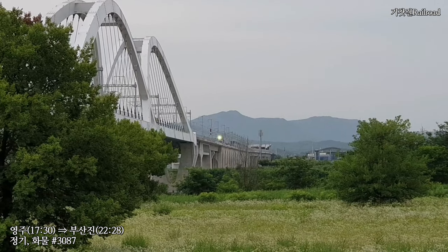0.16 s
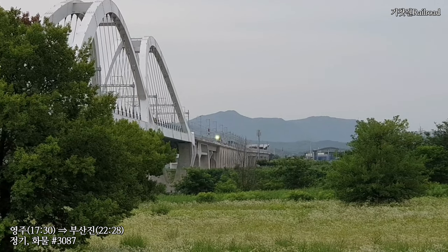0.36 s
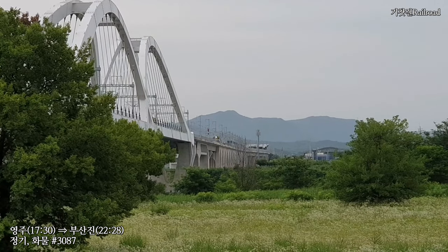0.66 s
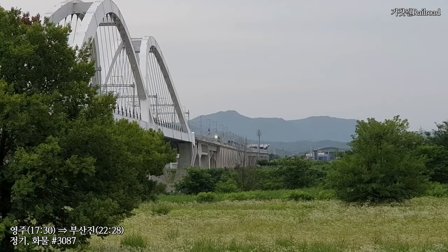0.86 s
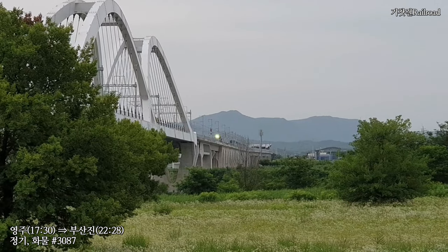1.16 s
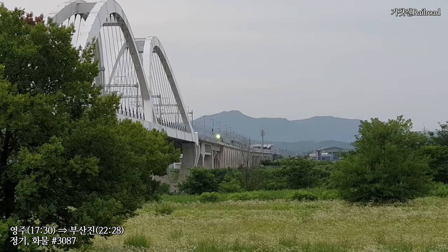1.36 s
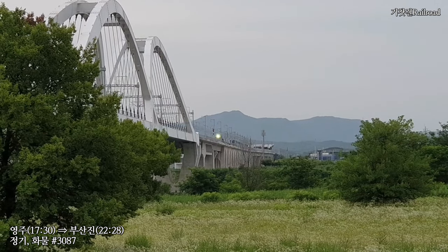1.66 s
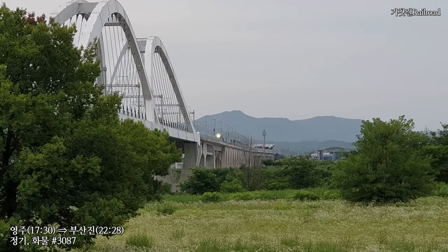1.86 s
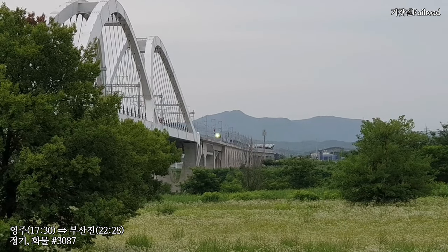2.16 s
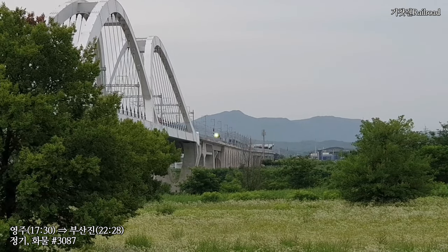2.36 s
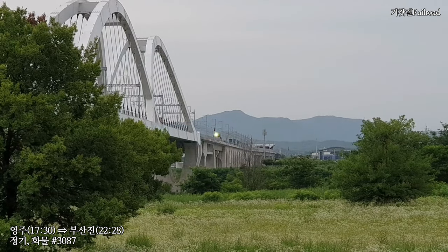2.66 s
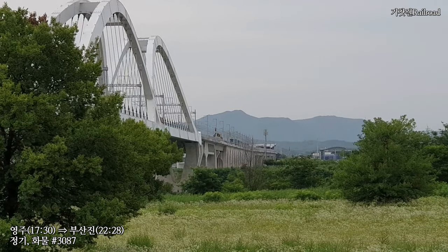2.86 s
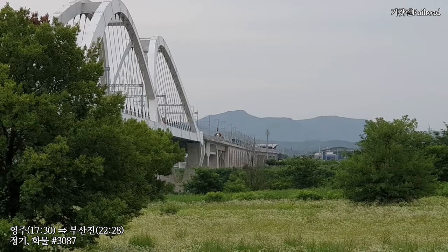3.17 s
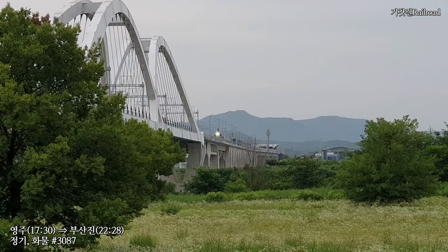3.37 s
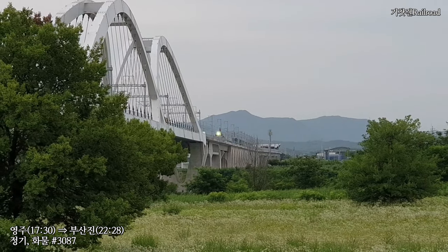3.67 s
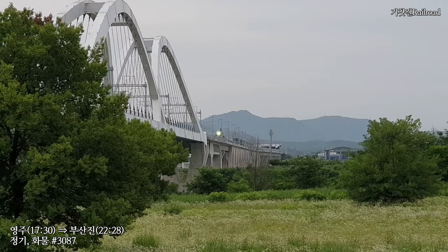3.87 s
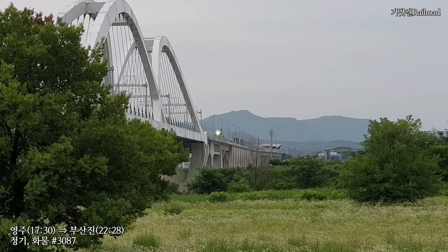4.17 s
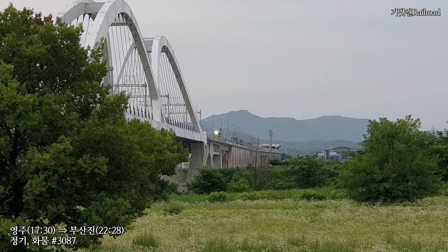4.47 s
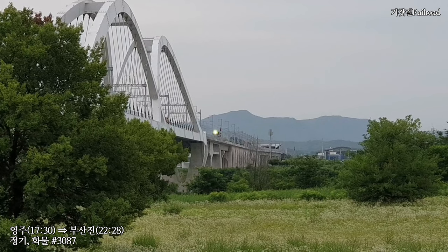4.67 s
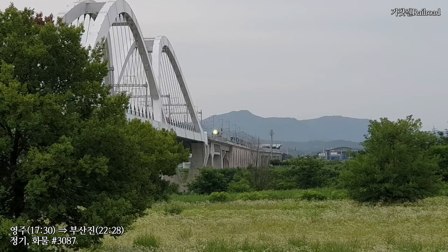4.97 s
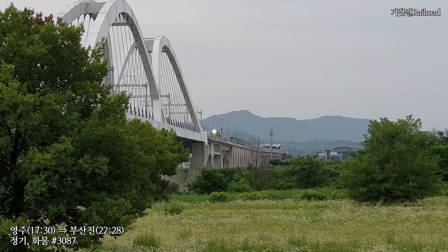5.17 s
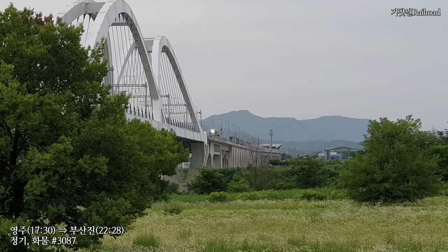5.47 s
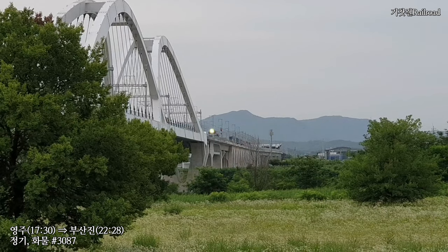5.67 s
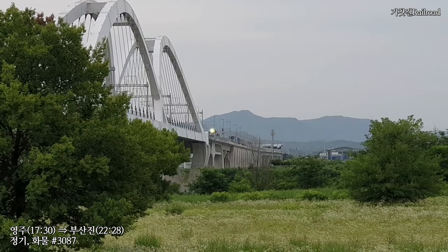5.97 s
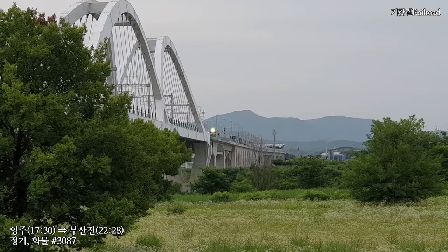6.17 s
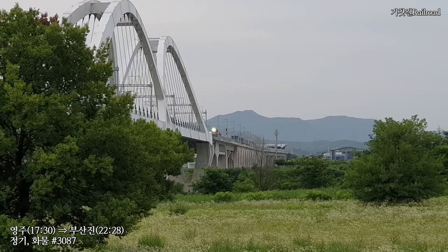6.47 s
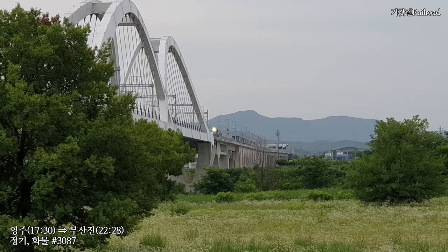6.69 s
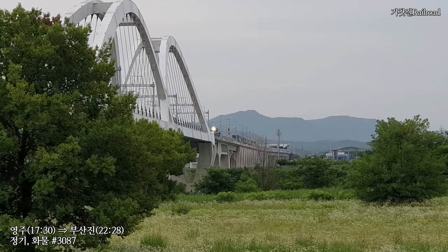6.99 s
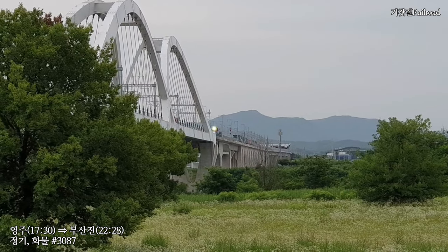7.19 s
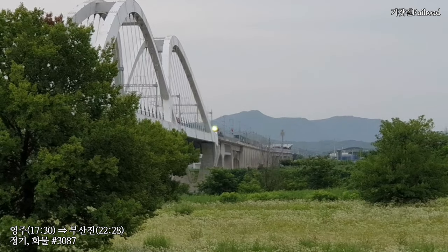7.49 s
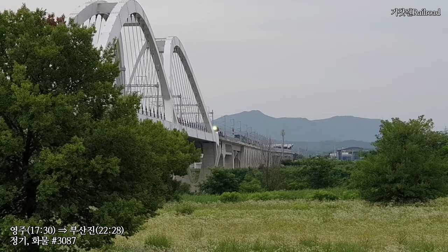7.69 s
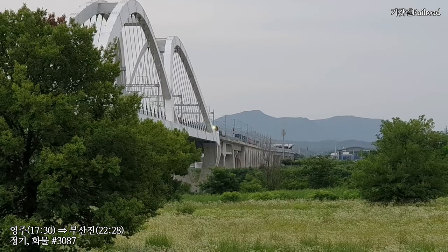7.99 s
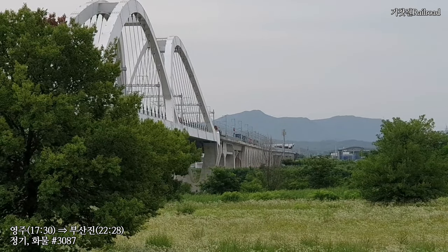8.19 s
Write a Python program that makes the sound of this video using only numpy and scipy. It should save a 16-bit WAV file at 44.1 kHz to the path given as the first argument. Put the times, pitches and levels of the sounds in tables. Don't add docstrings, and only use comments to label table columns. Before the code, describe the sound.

A wide, distant stereo pickup in open grass: a low diesel drone with a gentle throb, soft bridge rumble and river wash under a bright insect chorus. Fast dry cricket scraping opens the scene and comes back later for over a second. Between and after, brief husky sparrow chirps come from bushes on the right. Near the end the engine drone swells, changes tone and eases.

```python
import sys
import numpy as np
from scipy import signal
from scipy.fft import rfft, irfft, next_fast_len
from scipy.io import wavfile
from scipy.ndimage import uniform_filter1d

SR = 44100
rng = np.random.default_rng(int(sys.argv[2]) if len(sys.argv) > 2 else 0)


def invert_db(level):
    return 10 ** (np.asarray(level, dtype=float) / 20)


def materialize(psi):
    bounded = np.clip(np.atleast_2d(psi).T, -1, 1)
    quanta = np.round(bounded * 32767).astype(np.int16)
    wavfile.write(sys.argv[1], SR, quanta)


N = 367794
TIME = np.arange(N) / SR
SIZE = next_fast_len(N)
FREQ = np.maximum(np.arange(SIZE // 2 + 1) * SR / SIZE, 1)


def curve(table):
    s, value = np.transpose(table)
    return np.interp(TIME, s, value)


def over_hz(table, hz):
    f, v = np.transpose(table)
    return np.interp(np.log(hz), np.log(f), v)


def level(x, db):
    return x * invert_db(db) / np.sqrt(np.mean(x ** 2))


def walk(rate_hz):
    knots = rng.standard_normal(int(N / SR * 2 * rate_hz) + 3)
    knots = uniform_filter1d(knots, size=2) * 1.6
    return np.interp(TIME * 2 * rate_hz, np.arange(len(knots)), knots)


def bands(spectrum, low_hz, high_hz, octaves):
    centres = low_hz * 2 ** np.arange(0, np.log2(high_hz / low_hz) + octaves, octaves)
    place = np.clip(np.log2(FREQ / low_hz) / octaves, 0, len(centres) - 1)
    for k, hz in enumerate(centres):
        weight = np.cos(np.pi / 2 * np.clip(place - k, -1, 1)) ** 2
        yield hz, irfft(spectrum * weight, SIZE)[..., :N]


def noise(colour, channels):
    return rfft(rng.standard_normal((channels, SIZE))) * invert_db(over_hz(colour, FREQ))


def scatter(x, t60_s, gap_s):
    t = np.arange(int(SR * .6)) / SR
    envelope = invert_db(-60 * t / t60_s) * (1 - np.exp(-t / gap_s))
    tail = rng.standard_normal((2, len(t))) * envelope
    tail = tail / np.sqrt(np.sum(tail ** 2, axis=1, keepdims=True))
    both = np.atleast_2d(x) * np.ones((2, 1))
    return signal.fftconvolve(both, tail, axes=1)[:, :N]


def pan(x, db):
    return x * invert_db(np.array([[db / 2], [-db / 2]]))


# time in seconds, level in dB.
DRONE = [(0, -38), (.8, -37), (1.5, -38.5), (2.4, -37.5), (3.3, -36), (4.15, -35), (4.55, -37), (4.9, -38),
         (5.4, -38.5), (6.5, -37), (6.9, -33), (7.2, -32.5), (7.5, -34.5), (7.8, -35), (8.1, -37.5),
         (8.33, -42)]
# shaft order, level in dB, change in dB once behind the arch.
SIDE_ORDERS = [
    (7, -46.5, 0),
    (9, -47, -12),
    (11, -55, 11),
]
# order, level in dB.
WEAK_ORDERS = [(4, -62.5), (5, -55), (6, -57), (10, -63.5), (12, -58.5), (13, -66.5), (14, -78.5),
               (15, -63), (16, -62), (17, -67), (18, -73), (19, -81.5), (23, -70.5), (24, -69)]
SHAFT_HZ, SLOWING_HZ_PER_S, START_RAD = 10.1866, .0012, -.12
ARCH_S, ARCH_RISE_S = 7.63, .25


def engine():
    turn = 2 * np.pi * (SHAFT_HZ * TIME - SLOWING_HZ_PER_S * TIME ** 2 / 2) + START_RAD
    arch = 1 / (1 + np.exp((ARCH_S - TIME) / ARCH_RISE_S))
    orders = [(8, curve(DRONE))]
    for order, db, change_db in SIDE_ORDERS:
        orders.append((order, db + change_db * arch + 2 * walk(2)))
    for order, db in WEAK_ORDERS:
        orders.append((order, db + .51 * (TIME - 4) + 3 * walk(1.2)))
    out = np.zeros(N)
    for order, db in orders:
        away = abs(order - 8)
        gust_db = (.8 if away == 0 else 1.4) * walk(7)
        lag_rad = away ** 1.45 + (away > 3) * rng.uniform(0, 2 * np.pi)
        out += invert_db(db + gust_db) * np.cos(order * turn + lag_rad)
    return pan(np.sqrt(2) * out, -3.5)


# time in seconds, nearness in dB.
RUMBLE_NEAR = [(0, -0.5), (1.5, -0.5), (2.8, 0), (3.6, -2), (5, -1), (6.3, 0.5), (7.2, 1.5), (8.34, 2)]
# frequency in Hz, density in dB per Hz.
RUMBLE_COLOUR = [(22, -7), (38, 5.5), (55, 14), (100, 0.5), (200, 1), (350, -4.5), (500, 1.5), (750, -5),
                 (1000, -13.5), (1500, -22.5), (2200, -35.5), (2800, -35.5), (3500, -41), (16000, -39.5)]
# frequency in Hz, left-right likeness 0-1.
RUMBLE_ALIKE = [(60, 1), (130, 0.5), (290, 0.79), (640, 0.31), (1400, 0.12)]
# frequency in Hz, left minus right in dB.
RUMBLE_PAN = [(100, -1.5), (700, -3), (1300, -6.5), (2400, -8.5), (5000, -4)]
BRIGHT_PER_DB, AIR_HZ = .8, 2700


def rumble():
    near_db = curve(RUMBLE_NEAR)
    mid, side = noise(RUMBLE_COLOUR, channels=2)
    alike = np.clip(over_hz(RUMBLE_ALIKE, FREQ), 0, 1)
    sign = np.array([[1], [-1]])
    pair = np.sqrt(1 + alike) * mid + sign * np.sqrt(1 - alike) * side
    pair = pair * invert_db(sign * over_hz(RUMBLE_PAN, FREQ) / 2)
    out = 0
    for hz, x in bands(pair, 40.8, 4000, .527):
        bright = 1 + BRIGHT_PER_DB * np.clip(np.log2(hz / 600), 0, 1)
        out = out + x * invert_db((hz < AIR_HZ) * bright * near_db + 1.12 * walk(5))
    return level(out, -49)


# time in seconds, peak in dB.
KNOCKS = [(.5, -82), (1.421, -65), (1.761, -71.5), (1.908, -69), (2.01, -86), (2.244, -61.5), (2.65, -78),
          (2.8, -63), (3.269, -72), (5.27, -72), (6.95, -76), (7.03, -70)]
# frequency in Hz, level in dB, t60 in seconds.
GIRDER = [(1000, 0, .05), (1250, -4, .04), (1700, -9, .05), (2120, -11, .03), (2850, -10, .03)]


def knocks():
    blows = np.zeros(N)
    for s, db in KNOCKS:
        blows += invert_db(db - 370 * np.abs(TIME - s))
    blows *= rng.standard_normal(N)
    t = np.arange(int(SR * .4)) / SR
    ring = sum(invert_db(db - 60 * t / t60_s) * np.sin(2 * np.pi * hz * t) for hz, db, t60_s in GIRDER)
    direct = signal.fftconvolve(blows, ring)[:N] * invert_db(-21.5)
    return pan(direct + scatter(direct, .29, .0062), -15)


# first stroke in seconds, end in seconds, stroke period in seconds,
# time gained by the hurried start in seconds, peak in dB.
BOUTS = [
    (.0362, .93, .04114, 0, -35.3),
    (5.477, 5.56, .037, 0, -37),
    (5.5812, 6.9, .04078, .0365, -36),
]
TIRING_S, HURRY_STROKES = 3.5e-5, 2.2
WAKES_S, WAKE_DB, WAKE_S = 5.47, -17, .07


def strokes():
    k = np.arange(40)
    start, peak_db = [], []
    for first_s, end_s, period_s, hurry_s, db in BOUTS:
        s = first_s + period_s * k + TIRING_S * k ** 2
        s = s - hurry_s * (1 - np.exp(-k / HURRY_STROKES))
        db = db + 1.2 * rng.standard_normal(len(k)) + WAKE_DB * np.exp(-np.abs(s - WAKES_S) / WAKE_S)
        start = np.append(start, s[s < end_s])
        peak_db = np.append(peak_db, db[s < end_s])
    return start, peak_db


# first tooth in seconds, last tooth in seconds, first dB, last dB.
SCRAPES = [
    (-.012, -.001, -24, -10.5),
    (-.0003, .004, -6, -7.5),
    (.008, .019, -17, -21.5),
]
# frequency in Hz, level in dB.
WING_LEFT = [(9500, -22.5), (11500, -11.5), (13000, -3), (14700, 3.5), (15800, 5.5)]
WING_RIGHT = [(9500, -40), (12000, -38.5), (13200, 2.5), (14200, -1), (15800, -0.5)]


def cricket():
    start, peak_db = strokes()
    teeth = [np.linspace((a, a_db), (b, b_db), 8) for a, b, a_db, b_db in SCRAPES]
    after, tooth_db = np.concatenate(teeth).T
    chance = rng.standard_normal((len(start), len(after), 4))
    when = start[:, None] + after + .0003 * chance[..., 0]
    click_db = peak_db[:, None] + tooth_db + 1.2 * chance[..., 1]
    clicks = np.zeros((2, N))
    for side in range(2):
        size = invert_db(click_db + 1.5 * chance[..., 2 + side])
        clicks[side] = np.bincount((when * SR).astype(int).ravel(), size.ravel(), N)
    wet = clicks + invert_db(-9) * scatter(clicks, .09, .004) + invert_db(-11) * scatter(clicks, .24, .03)
    wing_db = np.array([over_hz(WING_LEFT, FREQ), over_hz(WING_RIGHT, FREQ)]) - 41 * (FREQ < 8000)
    delay_s = np.array([[0], [15e-6]])
    wing = invert_db(wing_db) * np.exp(-2j * np.pi * FREQ * delay_s)
    return invert_db(20) * irfft(rfft(wet, SIZE) * wing, SIZE)[:, :N]


NOTE_SWELL_DB, NOTE_CUT_DB, NOTE_CUT_S = 9, 13, .004


def call(notes, start_s, length=1, pitch=1, accent_db=0):
    a, b, first_hz, last_hz, db = np.transpose(notes)
    db = db + accent_db
    s = np.transpose([a, b - NOTE_CUT_S, b - 1e-4]).ravel()
    hz = np.transpose([first_hz, last_hz, last_hz]).ravel()
    db = np.transpose([db - NOTE_SWELL_DB, db, db - NOTE_CUT_DB]).ravel()
    return np.transpose([start_s + length * s, pitch * hz, db])


def chirp(outline):
    s, hz, db = np.transpose(outline)
    span = slice(int(s[0] * SR), int(s[-1] * SR))
    hz, db = np.interp(TIME[span], s, hz), np.interp(TIME[span], s, db)
    weight = invert_db(2 * db)
    hz = uniform_filter1d(hz * weight, size=150) / uniform_filter1d(weight, size=150)
    phase = 2 * np.pi * np.cumsum(hz * (1 + .025 * walk(300)[span])) / SR
    husky = 1 + .8 * walk(700)[span]
    tone = np.sin(phase) + invert_db(-28) * np.sin(2 * phase) + invert_db(-29) * np.sin(3 * phase)
    out = np.zeros(N)
    out[span] = signal.windows.tukey(len(db), .1) * invert_db(db) * husky * tone
    return out


# from seconds, to seconds, first Hz, last Hz, peak in dB.
NOTES = [
    (.004, .018, 6500, 6300, -58),
    (.018, .042, 5150, 4700, -47),
    (.046, .062, 4000, 3800, -47),
    (.062, .074, 3400, 3200, -58),
    (.074, .104, 3300, 4050, -49),
    (.104, .118, 3500, 3050, -59),
]
# start in seconds, length ratio, level in dB, first note in dB, upturn in dB.
CHIRPS = [
    (2.789, 0.9, 1.5, -2, -4.5),
    (4.416, 0.97, 1.5, 1.5, 1),
    (6.712, 1., 0, 11.5, 0),
]
# start in seconds, level in dB, pitch ratio, left minus right in dB.
FAR_CHIRPS = [(1.15, -33, 0.94, -20), (2.599, -23.5, 0.98, -24), (2.68, -28, 1., -15),
              (3.335, -19, 1.02, -15), (3.425, -23, 1., -18), (3.949, -29.5, 1., -17),
              (4.66, -38.5, 0.53, -17), (4.87, -33.5, 0.97, -24), (5.128, -32.5, 0.96, -22),
              (5.189, -24, 0.94, -16), (5.33, -35, 0.91, -24), (7.679, -38, 0.89, -14),
              (8.12, -33, 0.81, -22)]


def sparrows():
    near = np.zeros(N)
    for start_s, length, db, first_db, upturn_db in CHIRPS:
        accent_db = db + np.array([first_db, 0, 0, 0, upturn_db, 0])
        near += chirp(call(NOTES, start_s, length, accent_db=accent_db))
    bushes = invert_db(-4) * scatter(near, .11, .002) + invert_db(-24) * scatter(near, .45, .04)
    echo = invert_db(-28) * np.roll(scatter(near, .3, .03), int(.22 * SR), axis=1)
    far = np.zeros((2, N))
    for start_s, db, pitch, pan_db in FAR_CHIRPS:
        far += pan(chirp(call(NOTES[1:3], start_s - .01, pitch=pitch, accent_db=db)), pan_db)
    return pan(near + bushes + echo, -16.5) + scatter(far, .22, .004)


# frequency in Hz, density in dB per Hz.
RIGHT_COLOUR = [(4800, -31.5), (5400, -17.5), (6000, -7.5), (7000, -2), (7900, 2), (8700, -2.5), (9500, -9),
                (10300, -14.5), (11200, -20.5), (12500, -35)]
LEFT_COLOUR = [(6000, -30), (7000, -17), (7500, -11), (8000, -5), (8700, 0), (9300, -1.5), (10000, -8),
               (10500, -15), (11500, -30)]
# time in seconds, level in dB.
LOW_SINGERS = [(0, 0), (3.8, 0), (5.3, -1.5), (5.8, -4.5), (6.5, -1), (7, 1.5), (8.1, 2), (8.34, 1.5)]
# frequency in Hz, level in dB.
SINGERS = [(7322, -76.5), (7647, -76), (7873, -75), (8149, -72), (8236, -75), (8608, -76), (9079, -81.5),
           (9522, -78.5)]
SURGE_DUCK = .2


def chorus():
    low_db = curve(LOW_SINGERS)
    right, left, voices = 0, 0, 0
    for hz, x in bands(noise(RIGHT_COLOUR, channels=1)[0], 5330, 11500, .15):
        low = np.clip((7200 - hz) / 1000, 0, 1.6)
        right = right + x * invert_db(low * low_db + .73 * walk(3) + .58 * walk(25))
    for hz, x in bands(noise(LEFT_COLOUR, channels=1)[0], 6500, 11000, .15):
        left = left + x * invert_db(.73 * walk(2.8) + .9 * walk(25))
    for hz, db in SINGERS:
        phase = 2 * np.pi * np.cumsum(hz + 6 * walk(4)) / SR
        voices = voices + invert_db(db + 2.4 * walk(6.8)) * np.sin(phase)
    hiss = np.array([level(left, -61.5), level(right * invert_db(-SURGE_DUCK * low_db), -49.5)])
    return hiss + voices * invert_db(np.array([[-10], [5]]))


# from seconds, to seconds, first Hz, last Hz, level in dB.
CREEPERS = [
    (.7, 1.999, 5600, 6150, -72),
    (2.698, 4.302, 5520, 5700, -71.5),
    (4.401, 5.7, 6200, 6420, -68),
    (6.9, 8.4, 6500, 6220, -63),
    (7.1, 8.4, 5920, 5840, -66.5),
]
CREEPER_WIDTH_HZ = 260


def creepers():
    out = np.zeros(N)
    for a, b, first_hz, last_hz, db in CREEPERS:
        part = np.clip((TIME - a) / (b - a), 0, 1)
        phase = 2 * np.pi * np.cumsum(first_hz + (last_hz - first_hz) * part) / SR
        swell = np.sqrt(np.sin(np.pi * part) + 1e-12)
        out += invert_db(db) * swell * (.2 + walk(CREEPER_WIDTH_HZ)) * np.sin(phase)
    return out * invert_db(np.array([[-20], [6]]))


# from seconds, to seconds, level in dB.
FAR_CRICKET = [
    (3.0, 3.2, -81),
    (3.36, 3.95, -76),
    (4.17, 4.25, -75),
    (6.1, 6.7, -64),
]
FAR_STROKE_HZ, FAR_FADE_DB_PER_S = 24, 246


def far_cricket():
    hiss = irfft(noise(WING_RIGHT, channels=2) * (FREQ > 11000), SIZE)[:, :N]
    pulses = np.cos(np.pi * FAR_STROKE_HZ * TIME) ** 4
    bouts = np.zeros(N)
    for a, b, db in FAR_CRICKET:
        outside_s = np.maximum(0, np.maximum(a - TIME, TIME - b))
        bouts += invert_db(db - FAR_FADE_DB_PER_S * outside_s)
    return pan(level(hiss * (.3 + pulses), 0) * bouts * invert_db(2 * walk(8)), -10)


def scene():
    train = engine() + rumble() + knocks()
    return train + cricket() + sparrows() + chorus() + creepers() + far_cricket()


# frequency in Hz, density in dB per Hz.
HEARING = [(1200, -125), (1900, -109), (3000, -108), (5000, -109), (7000, -110), (10500, -107),
           (11500, -104), (12500, -108), (16000, -110)]
# from seconds, to seconds.
KEPT_OPEN = [(.05, .09), (.23, .47), (.57, .73), (.77, .81), (.87, .93), (5.54, 5.66), (5.72, 5.76),
             (5.81, 5.88), (5.98, 6.02), (6.07, 6.11), (6.17, 6.22), (6.46, 6.54), (6.69, 6.72),
             (6.86, 6.9)]
BUSY_DB, BUSY_LOW_HZ, BUSY_HIGH_HZ = 10, 5150, 6100
TOP_HZ = 15830


def gate(x):
    stft = dict(window="cosine", nperseg=2048, noverlap=1024, scaling="psd")
    hz, s, spec = signal.stft(x, SR, **stft)
    edges = np.unique(np.cumsum(np.clip(np.arange(60) - 8, 4, 32)))
    band = np.searchsorted(edges, np.arange(len(hz)))
    first_bins = np.append(0, edges[edges < len(hz) - 1] + 1)
    power = np.add.reduceat(np.abs(spec) ** 2, first_bins, axis=1) / np.bincount(band)[:, None]
    held = uniform_filter1d(power, size=2, axis=2)[:, band]
    opened = sum((s > a) & (s < b) for a, b in KEPT_OPEN) * (hz < BUSY_LOW_HZ)[:, None]
    singing = sum((s > a - .02) & (s < b) for a, b, *_ in BOUTS)
    busy = singing * ((hz > BUSY_LOW_HZ) & (hz < BUSY_HIGH_HZ))[:, None]
    margin_db = 10 * np.log10(2 * held + 1e-20) - over_hz(HEARING, hz + 1)[:, None]
    margin_db += 20 * opened - BUSY_DB * busy * rng.uniform(size=power.shape)[:, band]
    margin_db += 2.5 * uniform_filter1d(rng.standard_normal(power.shape), size=2, axis=2)[:, band]
    keep = np.clip(margin_db + .5, 0, 1) * (hz < TOP_HZ)[:, None]
    return signal.istft(spec * keep, SR, **stft)[1][:, :N]


def roll_off(x):
    return signal.sosfilt(signal.butter(12, 16180, fs=SR, output="sos"), x)


def record(dry):
    mix = gate(dry)
    return roll_off(mix)


dry = scene()
out = record(dry)
materialize(out)
```